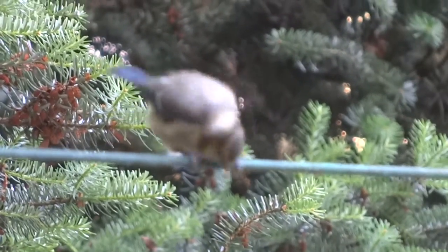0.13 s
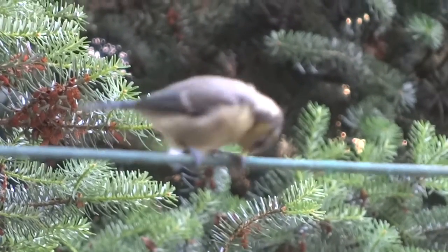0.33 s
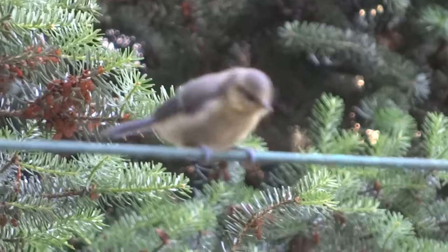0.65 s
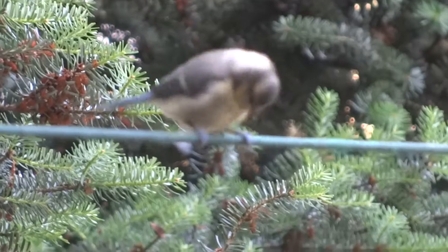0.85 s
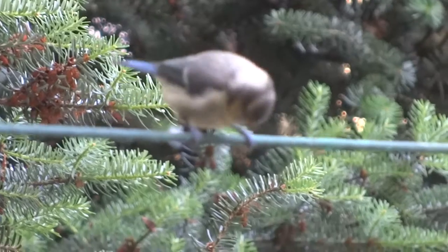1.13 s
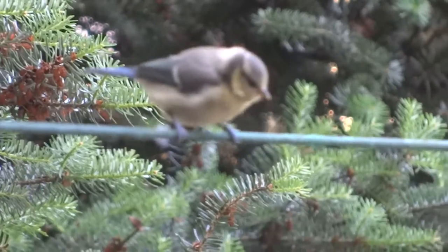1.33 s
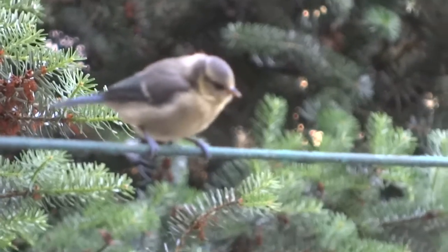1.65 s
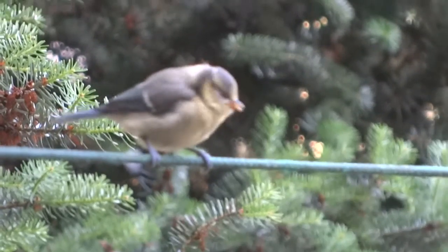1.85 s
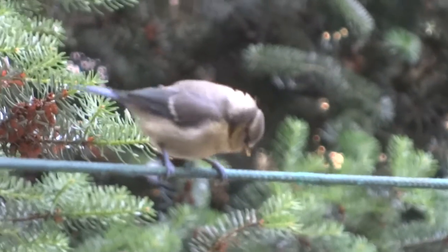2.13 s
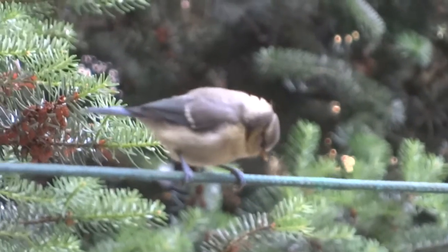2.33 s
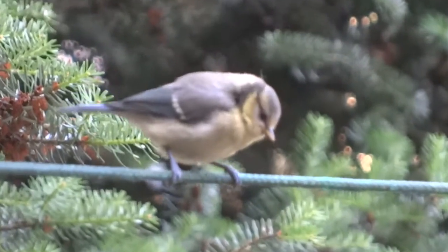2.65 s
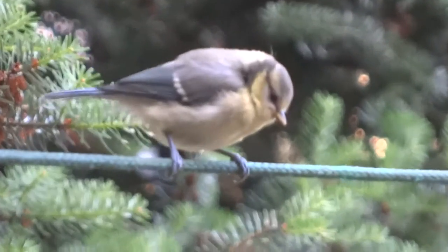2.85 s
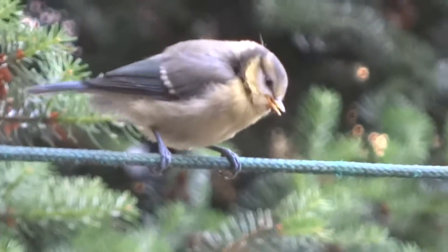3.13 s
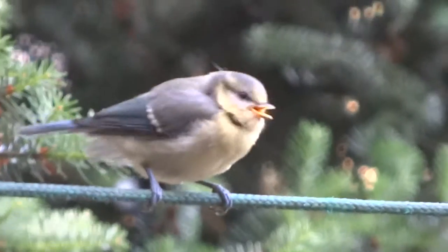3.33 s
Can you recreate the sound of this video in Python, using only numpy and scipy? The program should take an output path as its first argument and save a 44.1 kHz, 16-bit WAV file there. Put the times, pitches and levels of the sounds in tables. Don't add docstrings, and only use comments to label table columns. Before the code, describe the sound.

Fledgling birds beg with thin, very high chirps and hoarse cheeps over faint distant traffic

```python
import sys
import numpy as np
from scipy import signal
from scipy.fft import rfft, irfft
from scipy.io import wavfile

SR = 44100
rng = np.random.default_rng(int(sys.argv[2]) if len(sys.argv) > 2 else 0)


def store_wav(level_fs):
    pcm = np.round(np.clip(np.atleast_2d(level_fs), -1, 1) * 32767)
    wavfile.write(sys.argv[1], SR, pcm.T.astype(np.int16))


def invert_db(x):
    u = np.asarray(x, float) / 20
    return 10 ** u


N = 154350
LEAD = 4096
TOP_HZ = 15800

TONES = [(1, 0), (0, 1), (1, 1), (2, 0), (-1, 2), (2, -1), (-2, 3), (0, 2), (3, 0), (2, 1), (1, 2), (3, 1),
         (2, 2), (4, 0)]


def at_hz(points, hz):
    table_hz, table_value = np.array(points).T
    return np.interp(np.log(hz), np.log(table_hz), table_value)


def wander(size, rate_hz):
    r = np.exp(-2 * np.pi * rate_hz / SR)
    slow = signal.lfilter([1], [1, -2 * r, r * r], rng.standard_normal(12000))[2000:]
    return (slow / slow.std())[:size]


def add(out, start_s, sound):
    i = LEAD + int(start_s * SR)
    out[i:i + len(sound)] += sound[:len(out) - i]


def air():
    # pitch_hz, level_db
    air_color = [(30, -30), (60, -16), (170, -17), (550, -1.5), (1100, -7.5), (2500, -9.5), (7000, -16.5),
                 (15000, -20)]
    # pitch_hz, likeness (0 to 1)
    ear_likeness = [(60, 0.91), (160, 0.97), (500, 0.7), (1500, 0.64), (15000, 1)]
    hz = np.fft.rfftfreq(N, 1 / SR) + 1
    mid, side = rfft(rng.standard_normal((2, N))) * invert_db(at_hz(air_color, hz))
    alike = np.clip(at_hz(ear_likeness, hz), 0, 1)
    spectrum = np.sqrt(1 + alike) * mid + np.sqrt(1 - alike) * side * [[1], [-1]]
    x = irfft(spectrum, N)
    return invert_db(-53.5) * x / x.mean(axis=0).std()


def garden(birds):
    gap_s, side_share, dull_hz = 0.0033, 0.24, 11000
    t = np.arange(SR) / SR
    mid, side = rng.standard_normal((2, SR))
    fade = 0
    for level_db, t60_s in ((-7, 0.19), (-14.5, 0.48)):
        even_energy = np.sqrt(2 * np.log(1000) / t60_s / SR)
        fade = fade + invert_db(level_db - 60 * t / t60_s) * even_energy
    haze = (mid + side_share * side * [[1], [-1]]) * fade * (t > gap_s)
    dull = signal.sosfilt(signal.butter(2, dull_hz, fs=SR, output="sos"), birds)
    return signal.fftconvolve(dull[None], haze, axes=1)[:, :len(birds)]


def far_bird():
    # start_s, length_s, start_hz, top_hz, end_hz
    warble = [
        (0.485, .048, 3080, 4444, 2950),
        (0.528, .065, 3010, 3820, 2550),
        (3.305, 0.017, 3460, 3260, 2440),
        (3.363, 0.025, 4140, 4940, 3890),
        (3.371, 0.018, 3570, 3060, 2420),
        (3.43, .028, 3850, 3300, 2380),
        (-.02, 0.077, 2183, 2217, 2100),
    ]
    warble_db = [-38.5, -37, -40.5, -37, -39, -36.5, -49.5]
    out = np.zeros(N + LEAD)
    for (start_s, length_s, start_hz, top_hz, end_hz), level_db in zip(warble, warble_db):
        u = np.arange(int(length_s * SR)) / (length_s * SR)
        hz = start_hz * (1 - u) * (1 - 2 * u) + top_hz * 4 * u * (1 - u) + end_hz * u * (2 * u - 1)
        unsteady_hz = hz * (1 + 0.0135 * wander(len(u), 170.0))
        phase = np.cumsum(2 * np.pi * unsteady_hz / SR)
        waver = invert_db(2 * wander(len(u), 80.0))
        whistle = np.sin(phase) + invert_db(-26) * np.sin(2 * phase)
        add(out, start_s, invert_db(level_db) * waver * np.sin(np.pi * u) ** .5 * whistle)
    t = np.arange(400) / SR
    tick = np.sin(2 * np.pi * 1950 * t) * np.exp(-t / 0.0005)
    add(out, 1.533, invert_db(-34.5) * tick)
    return out


def beak_db(hz, tilt_db):
    # pitch_hz, level_db
    beak = [(2000, -23), (3500, -13), (5000, -2.5), (6600, 5), (8300, 1), (10000, -7), (13000, -14.5),
            (15500, -18)]
    tilt = tilt_db * np.log2(np.clip(hz, 2000, 8000) / 6600)
    return at_hz(beak, hz) + tilt - 40 * (hz < 1000)


def breath(size, tilt_db):
    hz = np.fft.rfftfreq(10000, 1 / SR) + 1
    x = irfft(rfft(rng.standard_normal(10000)) * invert_db(beak_db(hz, tilt_db)))
    return (x / x.std())[:size]


def throat(low_hz, high_hz, jitter):
    low_hz = low_hz * (1 + jitter * wander(len(low_hz), 150.0))
    high_hz = high_hz * (1 + jitter * wander(len(high_hz), 150.0))
    hz = np.abs(np.array(TONES) @ [low_hz, high_hz]) + 1
    waves = np.sin(np.cumsum(2 * np.pi * hz / SR, axis=1))
    return hz, np.sqrt(2) * (hz < TOP_HZ) * waves


def shape(t, length_s, attack_s, release_s):
    return np.clip(t / attack_s, 0, 1) ** 2 * np.clip((length_s - t) / release_s, 0, 1)


def hoarse_calls():
    # start_s, length_s, lower_hz, upper_hz, level_db
    hoarse = [(-.05, 0.073, 2210, 3310, -42.5), (0.478, 0.092, 2970, 3950, -37.5),
              (0.946, 0.061, 2900, 3914, -43), (1.068, .073, 2616, 3840, -41.5),
              (2.055, .12, 2887, 3830, -36), (2.403, 0.08, 2277, 2864, -39.5),
              (2.506, 0.067, 2130, 2558, -36.5), (2.647, 0.063, 2532, 4013, -35),
              (2.747, 0.064, 2800, 3755, -38), (2.858, 0.055, 2580, 4200, -32.5),
              (2.89, 0.038, 2830, 4320, -31), (2.976, 0.038, 2395, 4100, -36),
              (3.118, 0.051, 2745, 3700, -39), (3.216, 0.078, 2950, 4210, -37.5),
              (3.327, 0.083, 2480, 3620, -37), (3.473, .06, 2600, 3800, -38)]
    # start_pitch_share, rise_s, breath_db, tilt_db (per octave)
    hoarseness = [(1.2, 0.039, 0, -1.5), (1.1, 0.056, -6, -6), (0.52, .045, 0, -8), (0.4, 0.032, 1.5, -4),
                  (1.1, 0.017, -2, -2.6), (0.79, 0.043, -0.5, -2), (1, .03, -3, -1), (0.6, 0.021, 1.5, -1),
                  (0.79, 0.063, 4.5, -3), (0.41, 0.017, 1.5, 3), (.6, .04, -5, -4.5), (1.5, 0.031, 7.5, .1),
                  (.72, 0.045, 2.5, -2), (0.57, .045, -4, -0.5), (0.6, 0.023, -0.5, 8), (0.96, 0.12, 3, 5)]
    step_db, upper_loss_db, octave_lead_db = -4.5, -2, 5
    is_octave = (np.array(TONES) == (2, 0)).all(axis=1)
    order_db = np.abs(TONES) @ [step_db, step_db + upper_loss_db] + octave_lead_db * is_octave
    out = np.zeros(N + LEAD)
    for (start_s, length_s, low, high, level_db), manner in zip(hoarse, hoarseness):
        first_share, rise_s, breath_db, tilt_db = manner
        t = np.arange(int(length_s * SR)) / SR
        climb = np.sin(np.pi / 2 * np.clip(t / rise_s, 0, 1) ** 1.5)
        sag = 0.06 * (t / length_s) ** 5.0
        glide = 1 - (1 - first_share) * (1 - climb) - sag
        hz, waves = throat(low * glide, high * glide, 0.006)
        waver_db = 2.5 * np.array([wander(len(t), 74.0) for pair in TONES])
        tone = np.sum(waves * invert_db(beak_db(hz, tilt_db) + order_db[:, None] + waver_db), axis=0)
        voice = tone / tone.std() + invert_db(breath_db) * breath(len(t), tilt_db)
        add(out, start_s, invert_db(level_db) * shape(t, length_s, 0.024, 0.012) * voice)
    return out


def clear_calls():
    # start_s, length_s, lower_hz, upper_hz, level_db
    clear = [(0.086, .054, 6750, 7960, -33), (0.213, .09, 6650, 8090, -28),
             (0.463, 0.044, 6710, 8440, -43.5), (1.277, .05, 6900, 8330, -35.5),
             (1.604, .046, 6845, 8450, -30), (1.715, .08, 7160, 8810, -27.5),
             (1.879, .085, 6880, 8223, -24.5), (2.377, .108, 7100, 8330, -36),
             (2.554, .205, 6590, 8160, -45.5), (2.998, .043, 6654, 7940, -21),
             (3.117, .09, 6890, 8097, -29.5), (3.293, .055, 6770, 8200, -46)]
    # rise_s, droop_share, upper_lead_db, swell_db
    clear_manner = [(0.016, 0.0016, -4.5, -4), (0.0057, 0.0012, -4.5, 4.5), (0.00219, 0.71, -2, 2),
                    (.014, 0.0013, 1, -9), (0.001, .01, 5, 4.5), (.003, 0.0295, 4, 7.5),
                    (.003, 0.0419, -0.1, 8), (0.0044, .06, 1, 13.5), (0.0016, 0.069, -5, -5),
                    (0.0044, 0.0057, -11.5, 19), (0.00173, 0.0182, 6, -1), (0.0059, 0.27, -2, -18)]
    mixed_tone_db = [-24, -26, -21.5, -37, -34]
    rasp_s, rasp_lead_s, rasp_db = 0.015, 0.011, -11
    is_plain_sum = np.arange(5) == 0
    out = np.zeros(N + LEAD)
    for (start_s, length_s, low, high, level_db), manner in zip(clear, clear_manner):
        rise_s, droop, lead_db, swell_db = manner
        t = np.arange(int(length_s * SR)) / SR
        below = np.exp(-t / max(rise_s, 1e-3))
        late = (t / length_s) ** (2.3 if droop > .15 else 1.9)
        rise = 1 - 0.5 * below
        low_hz = low * rise * (1 - droop * late)
        high_hz = high * rise * (1 - 0.68 * droop * late)
        hz, waves = throat(low_hz, high_hz, 0.008)
        upper = waves[1] * invert_db(2 * wander(len(t), 60.0))
        lower = waves[0] * invert_db(2 * wander(len(t), 60.0))
        mixed_db = np.array(mixed_tone_db) + is_plain_sum * (5 - abs(lead_db) / 2)
        tone = invert_db(lead_db / 2) * upper + invert_db(-lead_db / 2) * lower + invert_db(mixed_db) @ waves[2:7]
        voice = tone * invert_db(-18 * below) + invert_db(-30) * breath(len(t), 0)
        swell = invert_db(level_db + swell_db * (t / length_s - 1))
        add(out, start_s, swell * shape(t, length_s, 0.0067, 0.0041) * voice)
        u = np.arange(3000) / SR / rasp_s
        rasp = u * np.exp(1 - u) * breath(len(u), 0)
        add(out, start_s - rasp_lead_s, invert_db(level_db - swell_db + rasp_db) * rasp)
    return out


def scene():
    far = far_bird()
    near = hoarse_calls() + clear_calls()
    direct = (near + far) * invert_db(-0.45 * np.array([[1], [-1]]))
    birds = direct + garden(near + invert_db(7) * far)
    return birds[:, LEAD:] + air()


def band_limit(x):
    return signal.sosfilt(signal.butter(12, 15910, fs=SR, output="sos"), x)


def record(dry):
    top_cut = signal.cheby2(10, 60, TOP_HZ + 400, fs=SR, output="sos")
    return band_limit(signal.sosfilt(top_cut, dry))


dry = scene()
out = record(dry)
store_wav(out)
```